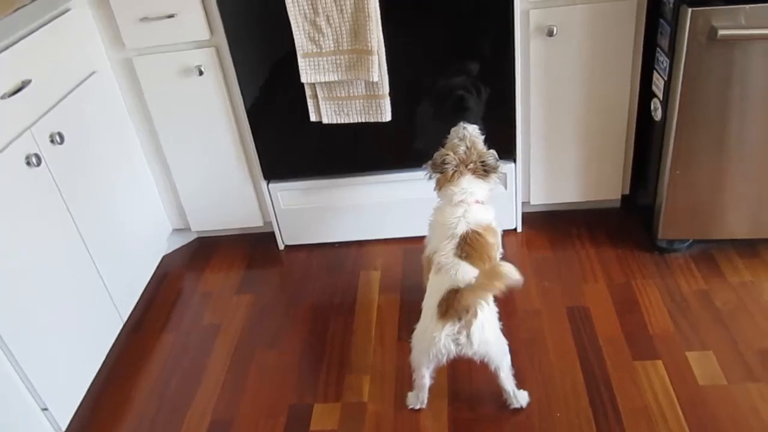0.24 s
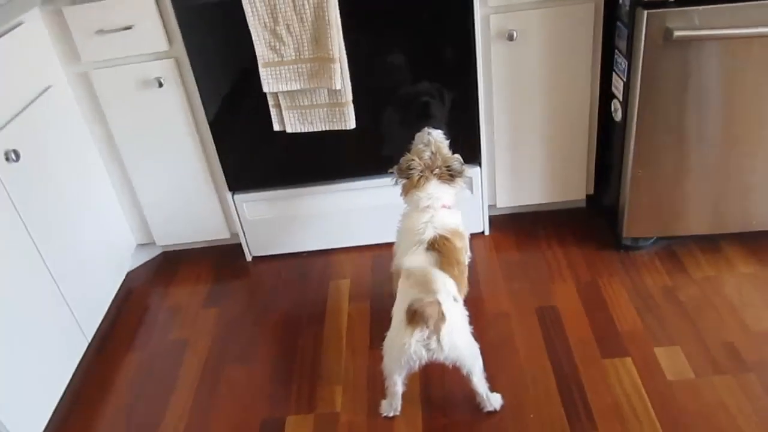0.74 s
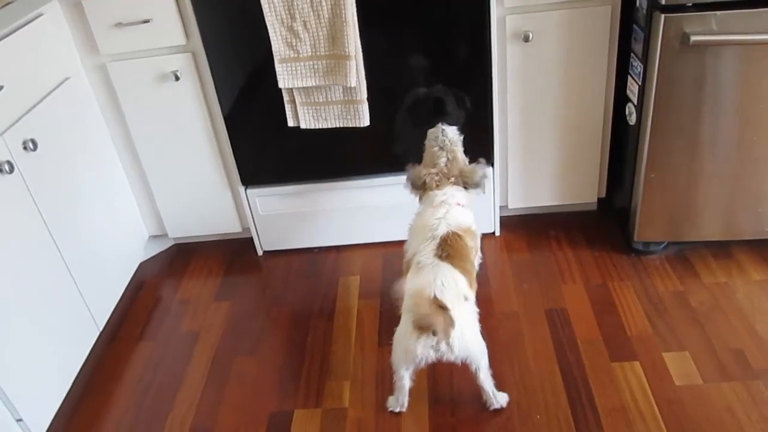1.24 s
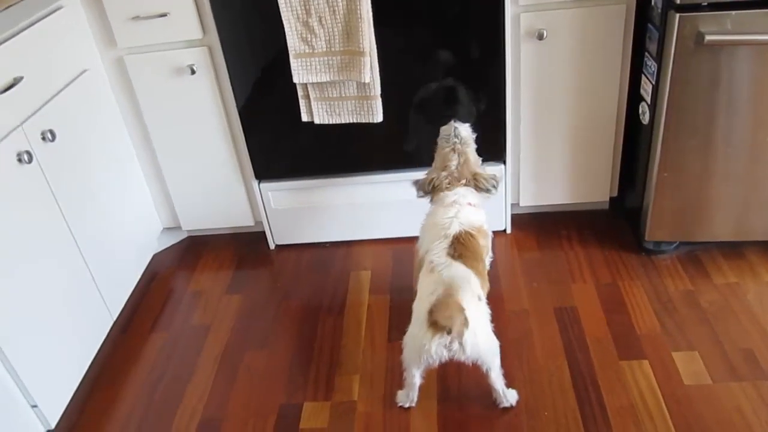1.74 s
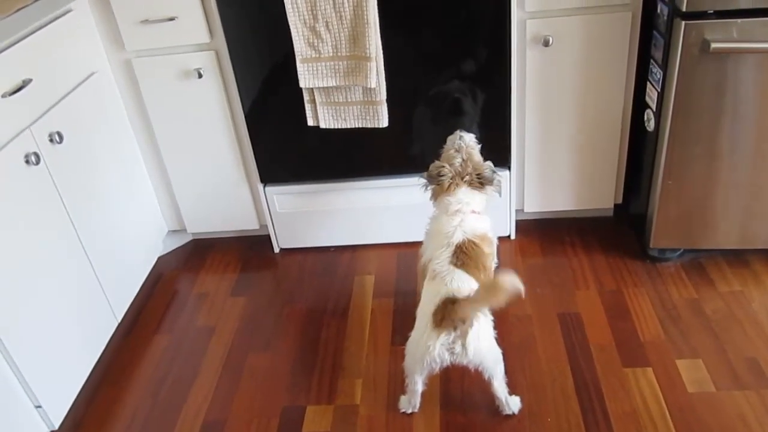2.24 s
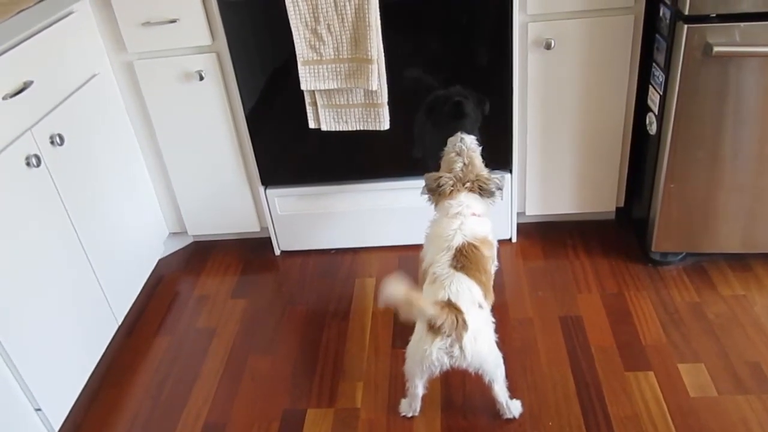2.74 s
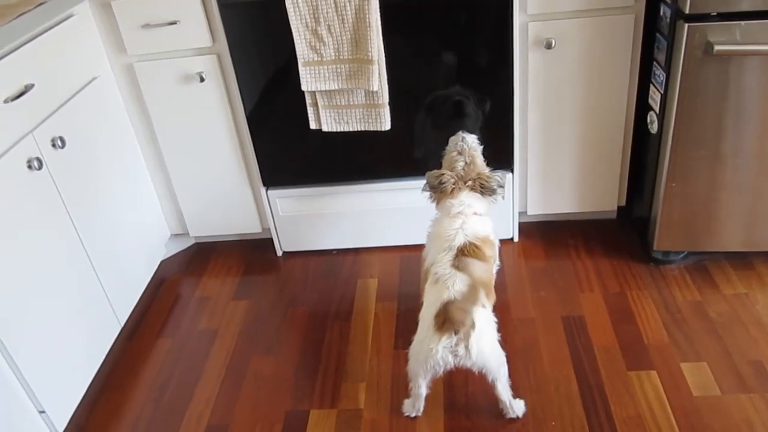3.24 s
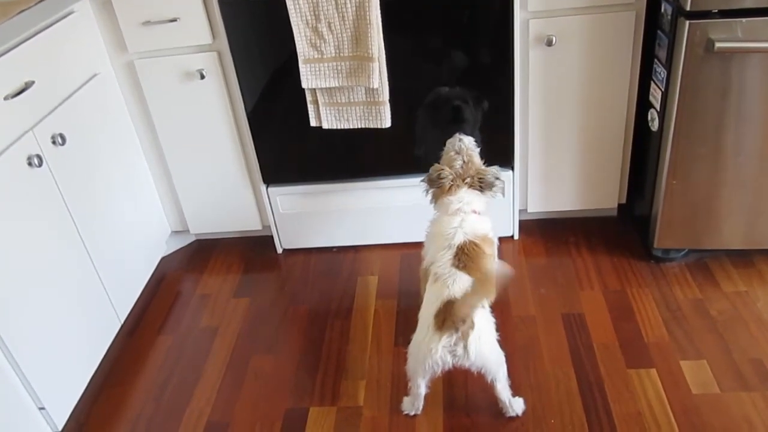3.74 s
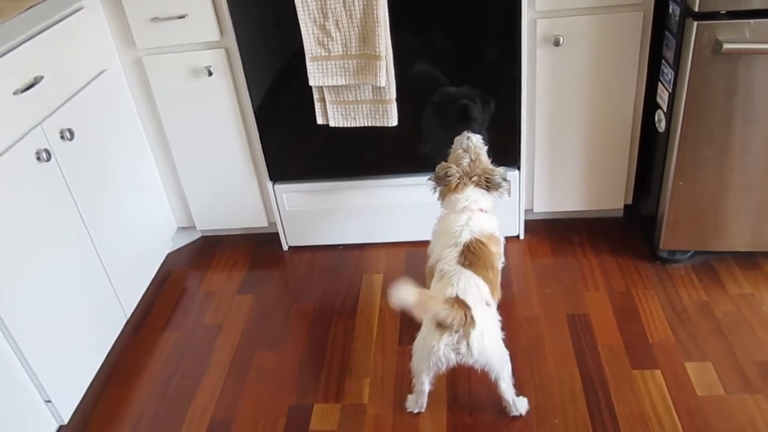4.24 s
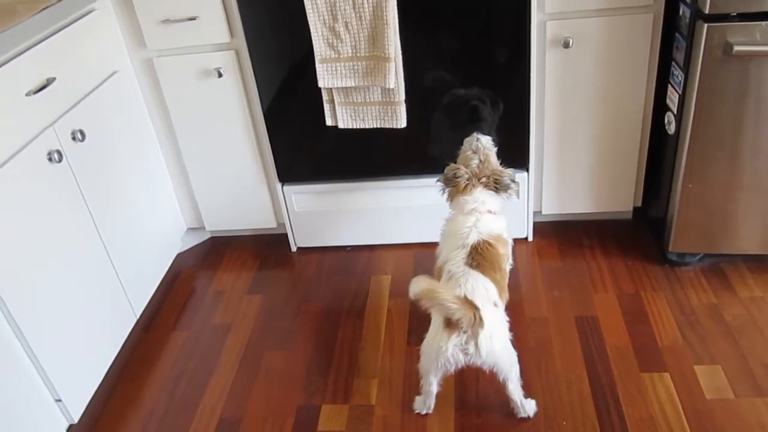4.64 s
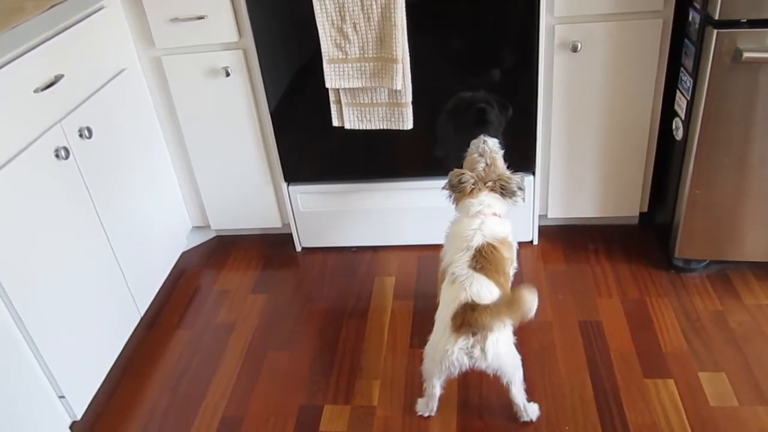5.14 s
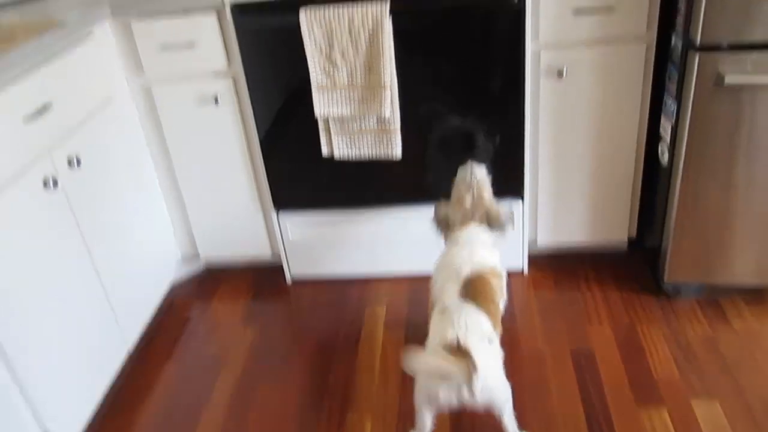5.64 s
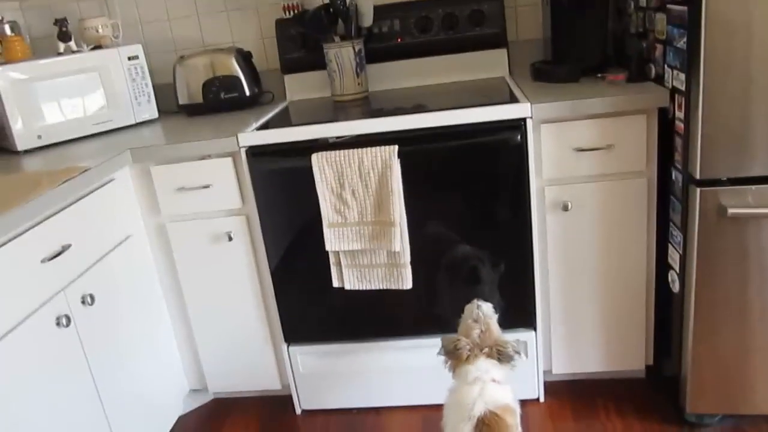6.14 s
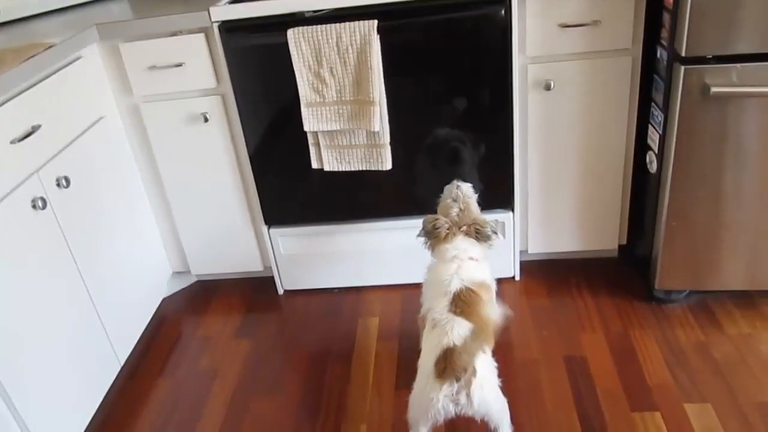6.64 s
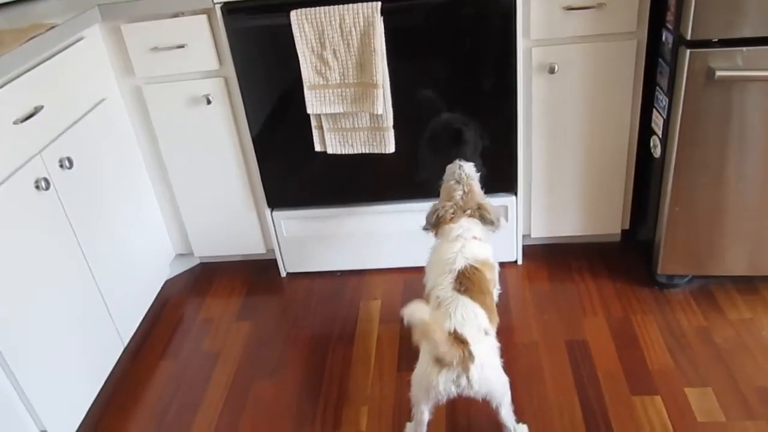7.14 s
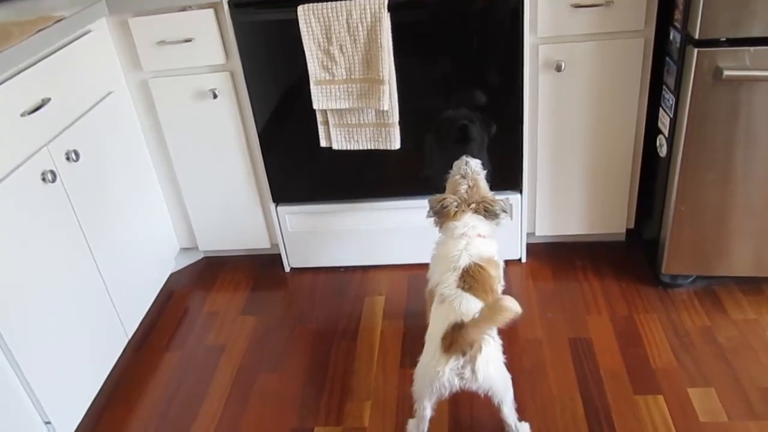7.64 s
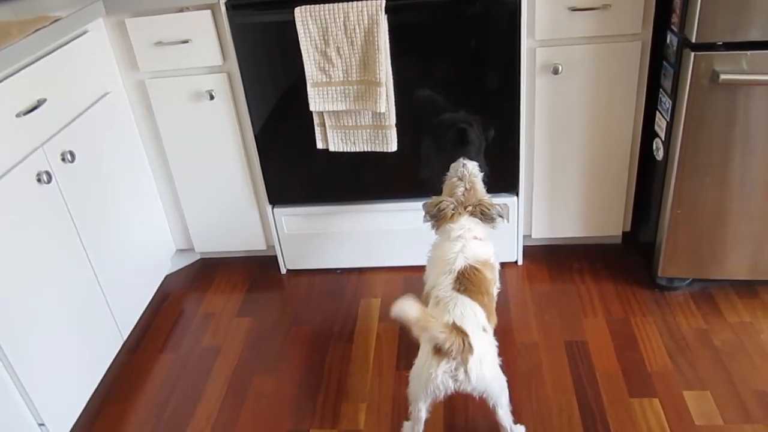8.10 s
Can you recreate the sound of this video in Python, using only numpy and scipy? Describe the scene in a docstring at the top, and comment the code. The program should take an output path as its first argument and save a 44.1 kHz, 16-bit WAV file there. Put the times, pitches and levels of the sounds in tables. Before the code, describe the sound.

A small dog growls and barks in a hard-walled kitchen. Faint hand bumps and throaty grunts come first, then a rising rattly growl breaks into two sharp barks and a quick sniff. Three longer growls follow, each ending in one yelping bark, and a final growl stops unbarked. Echoes ring after every bark over soft rumble and hiss. Close hand-held camera, nearly mono, ducking on loud sounds.

```python
"""A small dog growls at its reflection in an oven door, in a hard-walled kitchen over a steady hush of rumble and hiss.
Faint grunts and dull bumps of the hand on the camera are heard before and during the first growl and barks. Five growls
are noisy vocal-fold slaps through moving mouth resonances, with single hard flaps standing out. The first breaks into
two barks, the next three into one each, with yelps and squeaks; a sniff follows two barks, a low hum swells near 4 s,
and the last growl ends unbarked. Echoes ring on; a hand-held camera hears it almost in mono and turns down when loud."""
import sys
import numpy as np
from scipy import signal
from scipy.fft import rfft, irfft
from scipy.io import wavfile
from scipy.ndimage import uniform_filter1d, minimum_filter1d, map_coordinates

SR = 44100
rng = np.random.default_rng(int(sys.argv[2]) if len(sys.argv) > 2 else 0)


def wav_record(signal):
    """Record a signal, one row per channel, as 16-bit PCM in the file named by sys.argv[1]."""
    frames = np.transpose(np.atleast_2d(signal))
    bounded = np.clip(frames, -1, 1)
    # unit amplitude maps onto the largest positive 16-bit level
    quanta = np.round(bounded * 32767).astype(np.int16)
    wavfile.write(sys.argv[1], SR, quanta)


N = 369116
TIME = np.arange(N) / SR  # seconds


def amp(db):
    """Turn decibels into a gain."""
    return 10 ** (np.asarray(db) / 20)


def unit(x):
    """Scale x to an average (rms) strength of 1."""
    return x / np.sqrt(np.mean(x ** 2) + 1e-20)


def along(points, hz):
    """Read (Hz, value) points at any frequency, on a log axis."""
    f, v = np.transpose(points)
    return np.interp(np.log(hz + 1), np.log(f), v)


def curves(rows, t):
    """Read each column after the first at the times t."""
    s, *cols = np.transpose(rows)
    return [np.interp(t, s, c) for c in cols]


def bell(t, centre, width):
    """A smooth swell: 1 at its centre, down to 37 % one width away."""
    return np.exp(-((t - centre) / width) ** 2)


def wobble(t, rate):
    """A smooth random curve with `rate` random points a second."""
    knots = (t - t[0]) * rate
    return map_coordinates(rng.standard_normal(int(knots[-1]) + 4), [knots])


def ring(x, response):
    """Let x set off an impulse response of energy 1."""
    return signal.fftconvolve(x, response / np.linalg.norm(response))[:len(x)]


def colour(x, points, size=8192):
    """Shape x by a (Hz, dB) spectrum without any sound ahead of its cause."""
    log_gain = np.log(amp(along(points, np.fft.rfftfreq(size, 1 / SR))))
    # folding the cepstrum onto positive times gives the minimum-phase filter
    cepstrum = irfft(log_gain)
    cepstrum[1:size // 2] *= 2
    cepstrum[size // 2 + 1:] = 0
    return ring(x, irfft(np.exp(rfft(cepstrum))))


def resonate(x, modes, size=2048):
    """Fixed (Hz, width in Hz, dB) resonances, each of second order for dark valleys."""
    t = np.arange(size) / SR
    response = np.zeros(size)
    for hz, width_hz, db in modes:
        swell_and_fade = t * np.exp(-np.pi * width_hz * t * 1.5)
        response += amp(db) * width_hz ** 2 * swell_and_fade * np.sin(2 * np.pi * hz * t)
    return ring(x, response)


def glide(x, centre_hz, width_hz, size=2048):
    """One steep resonance with a moving centre; width_hz sets how fast its ringing fades."""
    t = np.arange(size) / SR
    # shift the moving centre down to 0 Hz, filter there, shift back
    turn = np.exp(2j * np.pi * np.cumsum(centre_hz) / SR)
    return np.sqrt(2) * np.real(turn * ring(x / turn, t * np.exp(-np.pi * width_hz * t)))


def span(start, length, attack, release):
    """Sample numbers of one call, its age in seconds, and a gate that opens at its start and closes after its end."""
    first = max(round(start * SR), 0)
    last = min(round((start + length + .12) * SR), N)
    at = np.arange(first, last)
    age = (at - at[0] + 1) / SR
    opening = 1 - np.exp(-age / attack)
    closing = np.exp(-np.maximum(age - length, 0) / release)
    return at, age, opening * closing


def puffs(rows, spectrum, attack):
    """Short bursts of coloured noise; each row: start in seconds, level in dB, seconds to fall by 60 dB."""
    shape = np.zeros(N)
    for s, db, t60 in rows:
        age = np.maximum(TIME - s, 0)
        shape += amp(db - 60 * age / t60) * (1 - np.exp(-age / attack))
    return shape * colour(rng.standard_normal(N), spectrum)


def notes(rows, sag_hz_per_s, waver, waver_rate):
    """Brief, nearly pure notes that swell, sag in pitch and die."""
    out = np.zeros(N)
    for s, width, hz, db in rows:
        at = np.flatnonzero(np.abs(TIME - s) < 3 * width)
        t = TIME[at]
        pitch = (hz - sag_hz_per_s * (t - s)) * (1 + waver * wobble(t, waver_rate))
        turns = np.cumsum(pitch) / SR + rng.random()
        out[at] += amp(db) * bell(t, s, width) * np.sin(2 * np.pi * turns)
    return out


def background():
    """Steady noise for the rumble and hiss of the home, with a low sine hum that swells and fades once."""
    # Each row: frequency in Hz, relative level in dB per Hz.
    home = [(12, -36.5), (20, -20.5), (55, 3), (211, -3.5), (270, -0.5), (363, -6), (464, -5), (964, -16.5),
            (1660, -18.5), (3540, -25.5), (6090, -30), (9910, -35), (13000, -53.5)]
    hush = amp(-50.5) * unit(colour(rng.standard_normal(N), home))
    hum = np.sqrt(2) * np.sin(2 * np.pi * 74.4 * TIME)
    return hush + amp(-50) * bell(TIME, centre=3.95, width=0.61) * hum


def bumps():
    """Dull thumps of the hand on the camera, from low noise."""
    # Each row: start in seconds, level in dB, seconds to fall by 60 dB.
    bump_times = [(0.33, -45, 0.67), (0.76, -40, 1), (1.2, -37, 0.18)]
    # Colour of a bump. Each row: frequency in Hz, level in dB.
    bump_colour = [(25, -33.5), (70, -5), (130, -11.5), (300, -12), (900, -85)]
    return puffs(bump_times, bump_colour, attack=0.0039)


def kitchen(x, first_wall=0.0036, early_db=4, early_time=0.11, count=14):
    """Dense fading echoes, strongest from the near cabinets; their fine pattern drifts slowly."""
    # How long the echoes last. Each row: frequency in Hz, seconds to fall by 60 dB.
    echo_times = [(200, 0.63), (530, 0.57), (1400, 0.64), (3700, 0.64), (9700, 0.56)]
    out = np.zeros(N)
    for k in range(count):
        # noise in which each frequency fades at its own speed
        hz, t, z = signal.stft(rng.standard_normal(SR * 3 // 4), SR, nperseg=256)
        fade = amp(-60 * t / along(echo_times, hz)[:, None])
        tail = signal.istft(z * fade, SR, nperseg=256)[1]
        age = np.arange(len(tail)) / SR
        tail *= (age > first_wall) * amp(early_db * np.exp(-age / early_time))
        # each random echo pattern fades into the next
        share = np.maximum(1 - np.abs(np.linspace(0, count - 1, N) - k), 0)
        at = np.flatnonzero(share)
        wet = signal.fftconvolve(x[at] * np.sqrt(share[at]), tail / np.linalg.norm(tail))[:N - at[0]]
        out[at[0]:at[0] + len(wet)] += wet
    return out


def standing_waves(x):
    """Parallel cabinet fronts strengthen a few tones and let them ring on."""
    # Each row: frequency in Hz, width in Hz, lift in dB.
    held_tones = [(410.4, 19, 4.5), (482, 18, 4), (579, 16, 4), (653, 22, 4), (792, 16, 4.5), (925, 24, 6),
                  (1050, 26, 4)]
    out = x.copy()
    for hz, width_hz, lift_db in held_tones:
        out += (amp(lift_db) - 1) * signal.lfilter(*signal.iirpeak(hz, hz / width_hz, SR), x)
    return out


def grunts():
    """Faint bursts of throaty noise before the first growl and the second bark."""
    # Each row: start in seconds, level in dB, seconds to fall by 60 dB.
    grunt_times = [(0.078, -39.5, 0.094), (0.368, -40, 0.28), (1.705, -44, 0.6)]
    # Colour of a grunt. Each row: frequency in Hz, level in dB.
    grunt_colour = [(150, 9), (450, 0.5), (650, 5.5), (900, 1), (1400, -16.5), (2150, -4), (2700, -22),
                    (3300, -8), (4500, -30), (9000, -17.5), (13000, -39)]
    return puffs(grunt_times, grunt_colour, attack=0.0051)


def sniffs():
    """The dog snatches air after a bark: a soft burst of hissing noise."""
    # Each row: start in seconds, level in dB, seconds to fall by 60 dB.
    sniff_times = [(2.0, -39.5, 0.32), (3.78, -40.5, 0.2)]
    # Colour of a sniff. Each row: frequency in Hz, level in dB.
    sniff_colour = [(500, -8), (1500, -10), (2000, 3), (2600, -9.5), (3200, -2), (4000, -23), (4700, -6),
                    (5600, -18.5), (8000, -13.5), (12000, -30)]
    return puffs(sniff_times, sniff_colour, attack=0.029)


def yelps():
    """Surges in which a bark breaks into a clear, sagging tone."""
    # Each row: centre in seconds, half-length in seconds, pitch at the centre in Hz before waver, level in dB.
    yelp_notes = [ (1.309, .014, 603.6, 0), (1.343, .009, 624.4, 4.5), (1.373, .009, 573.7, 2),
                  (1.828, .016, 641, -3.5), (1.893, .016, 784, -5.5), (3.469, .011, 608, -1.5),
                  (3.525, .014, 594, -5), (3.565, .009, 571, -7.5), (5.706, .014, 793.7, -3.5),
                  (5.757, .016, 578.8, -0.5), (5.82, .014, 648, -1.5), (7.071, .013, 650.5, -8.5),
                  (7.097, .009, 603.5, 0.5), (7.168, .018, 580, -2), ]
    return notes(yelp_notes, sag_hz_per_s=750, waver=0.02, waver_rate=224.6)


def squeaks():
    """Thin whistling tones at the height of a bark."""
    # Each row: centre in seconds, half-length in seconds, pitch at the centre in Hz before waver, level in dB.
    squeak_notes = [ (1.307, .008, 4620, -25), (1.36, .008, 4650, -15), (1.79, 0.013, 4800, -44),
                    (3.5, .008, 4550, -26), (3.53, 0.012, 4660, -20), (5.745, 0.012, 4660, -25),
                    (5.787, 0.0082, 4667, -23), ]
    return notes(squeak_notes, sag_hz_per_s=1660, waver=0.014, waver_rate=990)


def folds(rate, jitter, scatter_db, limp_db, puff):
    """Uneven vocal-fold slaps, alternating strong and weak by limp_db, and the puff of air after each; both rms 1."""
    cycles = np.cumsum(rate) / SR
    chance = rng.standard_normal((int(cycles[-1] * 2) + 2, 2))
    gaps = np.exp(jitter * chance[:, 0] - jitter ** 2 / 2)
    at = np.searchsorted(cycles, np.cumsum(gaps) - gaps[0]) + SR // 1000
    sizes = amp(scatter_db * chance[:, 1] + limp_db * (-1) ** np.arange(len(at)))
    keep = at < len(rate)
    slaps = np.bincount(at[keep], sizes[keep], len(rate)) / np.sqrt(rate)
    # each slap lets out air that dies away over `puff` seconds
    flow = np.sqrt(signal.lfilter([1], [1, -np.exp(-1 / (puff * SR))], slaps ** 2))
    return unit(slaps), unit(flow * rng.standard_normal(len(rate)))


def hoarse(slaps, puffs_of_air, air, window):
    """Slaps mixed with a share of air; held lung pressure evens out the slow swells."""
    x = np.sqrt(1 - air) * slaps + np.sqrt(air) * puffs_of_air
    power = np.abs(uniform_filter1d(x ** 2, int(window * SR)))
    return x / np.sqrt(power + 0.098)


def hard_flaps(t, puff_db=-16, puff_s=0.0059, pause_s=0.0094):
    """The folds stick for a moment, then burst open: how freely they rattle, and the bursts."""
    # Single flaps that stand out of a growl. Each row: time in seconds, level in dB.
    flap_times = [ (0.757, -14), (0.799, -16.5), (0.836, -14.5), (0.874, -9), (0.913, -6), (0.95, -6),
                  (0.995, -7), (1.052, 0.5), (1.233, -5), (2.348, -9), (2.378, -8.5), (2.702, -10.5),
                  (2.806, 0.5), (3.202, 0.5), (3.267, -1), (4.094, -9), (4.171, -3), (4.305, 1), (4.393, 2),
                  (4.58, 3), (4.657, 1.5), (4.702, 2), (5.127, 4.5), (6.285, -15), (6.305, -12),
                  (6.708, -1.5), (7.671, -12.5), (7.752, 0), (7.828, -4), (7.855, 0), (7.953, -1),
                  (8.039, -2), (8.074, 0), (8.13, -2), ]
    free, bursts = np.ones(len(t)), np.zeros(len(t))
    for s, db in flap_times:
        if t[0] <= s < t[-1]:
            first = np.searchsorted(t, s)
            fade = np.exp(-(t[first:] - s) / puff_s)
            burst = amp(puff_db) * fade * rng.standard_normal(len(t) - first)
            burst[0] = 1  # the click of the flap itself
            bursts[first:] += amp(db) * burst
            free *= 1 - .8 * bell(t, s - pause_s, pause_s)
    return free, bursts


def growls():
    """A dense, uneven rattle broken by single hard flaps, through chest, throat, mouth and lips."""
    # Each row: start in seconds, length in seconds, level at the start in dB, level at the end in dB, softness of the
    # onset in dB, chest tone in dB, muzzle overtones in dB (both against the level), mean rattle rate in Hz.
    growl_rows = [ (0.679, 0.67, -46.5, -24, -1.5, 0, -24, 90),
                  (2.348, 1.05, -30.5, -23, 10.5, -3.5, -35.5, 74.97),
                  (4.092, 1.684, -26.5, -18, 4, -6, -29, 72.06),
                  (6.285, 0.87, -22.5, -22, 6, -9, -30, 84.95),
                  (7.666, 0.83, -29, -20.5, 2, -8.5, -37.5, 71.69), ]
    # The lips curl once in each growl. Each row: seconds after its start, half-length in seconds, snarl in dB against
    # the level, lip resonance in Hz, its glide in Hz per second, bared-teeth overtones in dB against the snarl.
    lip_curls = [ (0.11, 0.26, -18, 2330, -450, -4.5), (0.077, 0.15, -25, 1930, 898, -6),
                 (0.34, 0.37, -31.5, 2010, 297, -7), (0.33, 0.4, -23.5, 2139, -18, -7.5),
                 (0.085, 0.48, -17.5, 2172, -120, -8.5), ]
    # The tongue drops and frees the mouth. Each row: seconds after the start, time of the drop in seconds, mouth
    # resonance it sinks to in Hz, mouth in dB against the level before, and after.
    tongue_drops = [(0.52, .055, 1600, -51, -19), (0.36, 0.05, 1406, -29.5, -26),
                    (0.7, 0.037, 1595, -45.5, -23.5), (0.74, .055, 1500, -42, -21),
                    (.72, .055, 1600, -45, -24)]
    # Brief surges and slackenings of the throat. Each row: centre in seconds, half-length in seconds, change in dB.
    throat_surges = [ (0.94, 0.11, 7), (1.09, 0.035, 8), (2.83, 0.042, 8), (2.91, 0.19, 6),
                     (3.381, 0.08, -2), (4.42, 0.04, 3), (4.735, 0.027, 3.5), (4.849, 0.057, -2.5),
                     (6.741, 0.137, -1.5), (6.987, 0.032, -10.5), (8.03, 0.044, -5), (8.3, 0.1, 1), ]
    # Throat with the mouth nearly shut. Each row: frequency in Hz, level in dB.
    throat = [(250, -28.5), (380, -16), (470, -6), (530, -3.5), (580, 1), (650, 1.5), (715, -3), (795, -1),
              (880, -16), (1200, -29), (2600, -65), (6000, -65), (12000, -86)]
    # The deep part of the growl. Each row: frequency in Hz, level in dB.
    deep = [(60, -24.5), (150, -24.5), (190, -10.5), (225, 0), (300, -11), (345, -8), (405, -2), (480, 8),
            (560, -5.5), (800, -28), (2000, -77)]
    # Thin overtones of every growl. Each row: frequency in Hz, width in Hz, level in dB.
    muzzle = [(2790, 840, -4.5), (7030, 200, -2)]
    # Overtones that bared teeth add. Each row: frequency in Hz, width in Hz, level in dB.
    teeth = [(3197, 190, -1), (3800, 140, -1.1), (6760, 170, -1.3)]
    # Air between the lips. Each row: frequency with slack lips in Hz, width setting in Hz, dB against the muzzle.
    lip_air = [(7720, 260, -18.5), (9020, 310, -14.5)]
    relaxed_db, lips_top_hz = -41.5, 2470  # snarl with slack lips; cap on the lip resonance before its tremble
    lift_per_db = 0.0034  # share by which the lip air rises per dB of snarl
    shut_hz, sink_hz_per_s = 1710, 120  # mouth resonance before the tongue drops; its slow fall afterwards
    out = np.zeros(N)
    for growl, curl, tongue in zip(growl_rows, lip_curls, tongue_drops):
        start, length, first_db, last_db, onset_db, chest_db, muzzle_db, rattle_hz = growl
        drop_s, drop_time, open_hz, shut_db, open_db = tongue
        curl_s, curl_width, curl_db, lips_hz, lips_glide, teeth_db = curl
        at, age, gate = span(start, length, attack=0.00096, release=0.011)
        t = TIME[at]
        db = np.interp(age, [0, length], [first_db, last_db]) - onset_db * np.exp(-age / 0.099)
        surge_db = sum(lift_db * bell(t, s, width) for s, width, lift_db in throat_surges)
        snarl_db = relaxed_db + (curl_db - relaxed_db) * bell(age, curl_s, curl_width)
        dropped = .5 + .5 * np.tanh((age - drop_s) / (2 * drop_time))

        rate = rattle_hz * np.exp(.2 * wobble(t, rate=14))
        source = folds(rate, jitter=.4, scatter_db=3, limp_db=0, puff=.005)
        free, bursts = hard_flaps(t)
        pressure = amp(db) * gate * free
        rattle = hoarse(*source, air=.3, window=.06) * pressure
        hiss = hoarse(*source, air=.65, window=.06) * pressure + amp(-2) * bursts
        push = rattle * amp(surge_db) + bursts
        snarl = hiss * amp(snarl_db)
        mouth = hiss * amp(surge_db + shut_db + (open_db - shut_db) * dropped)
        overtones = hiss * amp(muzzle_db)

        tremble = 1 + 0.006 * wobble(t, rate=12)
        sink_hz = sink_hz_per_s * np.maximum(age - drop_s, 0)
        mouth_hz = shut_hz + (open_hz - shut_hz) * dropped - sink_hz
        curled_hz = np.minimum(lips_hz + lips_glide * age, lips_top_hz)
        lowest_hz = np.interp(snarl_db, [-42, -23], [780, 1010])  # baring the teeth lifts the lowest resonance

        out[at] += amp(-1.5) * colour(push, throat)
        out[at] += amp(1.0) * colour((rattle + bursts / 2) * amp(chest_db), deep)
        out[at] += amp(-17.5) * glide(push, lowest_hz * tremble, width_hz=142)
        out[at] += amp(-16) * resonate(overtones, muzzle)
        out[at] += amp(teeth_db) * resonate(snarl, teeth)
        out[at] += amp(-0.5) * glide(snarl, curled_hz * tremble, width_hz=135)
        out[at] += glide(mouth, mouth_hz * tremble, width_hz=95)
        out[at] += amp(-7) * glide(mouth, .88 * mouth_hz, width_hz=380)
        for hz, width_hz, air_db in lip_air:
            lifted_hz = hz * (1 + lift_per_db * (snarl_db - relaxed_db)) * tremble
            out[at] += glide(overtones * amp(air_db), lifted_hz, width_hz)
    return out


def barks():
    """Hard-driven folds that double their period; the jaw opens a moment after the voice starts, then shuts."""
    # Each row: start in seconds, length in seconds, level in dB, open jaw in dB, rasp in dB (both against the level),
    # lag of the jaw in seconds, factor on the mouth resonances.
    bark_rows = [ (1.267, 0.168, 1, -8, -30.5, 0.015, 0.949),
                 (1.741, 0.17, -6.5, -8.5, -32.5, 0.0054, 0.97), (3.44, 0.15, -0.5, -6, -29, 0.019, 1.03),
                 (5.682, .19, -3.5, -6, -28, 0.03, 0.976), (7.051, 0.17, -4.5, -4.5, -26, 0.027, 1.09), ]
    # Pitch through a bark. Each row: share of its length, slap rate in Hz before its random waver.
    bark_pitch = [(0, 261.2), (.2, 405.7), (.55, 400), (.85, 348), (1.1, 266), (1.4, 187)]
    # Two sinking mouth resonances. Each row: share of the length, vowel in Hz, upper in Hz, before the bark's factor.
    bark_vowel = [(0, 1436, 3240), (.25, 1315, 3190), (.5, 1286, 2940), (.8, 1161, 2830), (1, 960, 2810)]
    # Chest tone. Each row: frequency in Hz, level in dB.
    chest = [(100, -35), (220, -23.5), (320, -12), (400, -13), (480, 5), (580, 5.5), (650, 1), (720, -1.5),
             (800, -5.5), (900, -12), (1300, -20), (3000, -66.5)]
    # Open jaw. Each row: frequency in Hz, level in dB.
    jaw_colour = [(600, -32.5), (900, 6), (1050, 14), (1300, 1), (1550, -8.5), (1800, -14.5), (2300, -18.5),
                  (3300, -28.5), (4200, -26.5), (7000, -60.5)]
    # Rasp. Each row: frequency in Hz, level in dB.
    rasp_colour = [(1500, -47), (2400, -4), (3600, -20), (4200, -18.5), (4540, 14), (4800, 14),
                   (5300, -4.5), (6300, 3), (6800, 1), (7700, 9.5), (9000, 5.5), (10000, -17), (11200, -3),
                   (13000, -39)]
    # Narrow tones that sing out about two thirds through. Each row: frequency in Hz, width in Hz, level in dB.
    closing_ring = [(2810, 90, 6), (6295, 250, -5)]
    sag_db, grain_db = 13.5, 8  # pressure lost over a bark; fall within each shake of the rattle
    jaw_widest, jaw_closing_db, rasp_closing_db = 0.11, 1, 14.5  # share of the length; loss of each by its end
    out = np.zeros(N)
    for start, length, level_db, jaw_db, rasp_db, jaw_lag, mouth_scale in bark_rows:
        at, age, gate = span(start, length, attack=0.018, release=0.02)
        gate = gate * (1 - np.exp(-age / 0.014))  # soft first moment
        progress = age / length
        db = level_db - sag_db * np.minimum(progress, 1)
        closed = ((progress - jaw_widest) / (1 - jaw_widest)) ** 2
        opening = .5 + .5 * np.tanh((age - jaw_lag) / 0.029)
        rate, = curves(bark_pitch, progress)
        vowel_hz, upper_hz = mouth_scale * np.array(curves(bark_vowel, progress))

        wavering_rate = rate * np.exp(.05 * wobble(age, rate=45))
        source = folds(wavering_rate, jitter=.035, scatter_db=2.5, limp_db=3, puff=.001)
        # a growl-like rattle, near 95 Hz, goes on shaking the bark
        shakes = np.cumsum(94.8 * np.exp(.3 * wobble(age, rate=60))) / SR
        grain = unit(amp(-grain_db * (shakes % 1)))
        pressure = amp(db) * gate
        voice = hoarse(*source, air=.07, window=.04) * pressure
        air = hoarse(*source, air=.7, window=.04) * pressure * grain
        jaw = voice * opening * amp(jaw_db - jaw_closing_db * closed) * grain
        rasp = air * opening ** 2 * amp(rasp_db - rasp_closing_db * closed)

        out[at] += amp(3.5) * colour(voice, chest)
        out[at] += amp(1.5) * colour(jaw, jaw_colour)
        out[at] += amp(-4.5) * glide(jaw, vowel_hz, width_hz=165)
        out[at] += amp(7.5) * colour(rasp, rasp_colour)
        out[at] += amp(-1.0) * glide(rasp, upper_hz, width_hz=160)
        out[at] += amp(5) * resonate(rasp * bell(progress, centre=.66, width=.25), closing_ring)
        # the folds slacken after the jaw shuts: a soft falling note
        trail = bell(progress, centre=1.2, width=0.23)
        out[at] += amp(-17.5 + db) * trail * np.sin(2 * np.pi * np.cumsum(rate) / SR)
    return out


def gain_control(x):
    """Loud sound turns the gain down; it stays down for a moment, then creeps back up."""
    loudest_db, hold_s, recovery_db_per_s = -11, 0.2, 12
    power = np.abs(uniform_filter1d(np.mean(x ** 2, axis=0), SR // 33))
    needed_db = np.minimum(loudest_db - 10 * np.log10(power + 1e-12), 0)
    half = int(hold_s * SR / 2)
    # the shifted window looks back over the hold time
    held_db = minimum_filter1d(needed_db, 2 * half + 1, origin=half, mode="nearest")
    climb_db = recovery_db_per_s * TIME
    return x * amp(np.minimum.accumulate(held_db - climb_db) + climb_db)


def scene():
    """Dog and echoes are mostly in the middle; the two microphone ports differ mainly above 950 Hz."""
    near = growls() + barks() + grunts() + sniffs()
    tones = yelps() + squeaks()
    wet = kitchen(near + amp(-7.0) * tones)
    dog = standing_waves(amp(-3.0) * (near + tones) + amp(-0.5) * wet)
    mid = dog + background() + bumps()
    spread = amp(-23) * kitchen(near, count=6) - amp(-25) * dog
    side = signal.sosfiltfilt(signal.butter(2, 950, "high", fs=SR, output="sos"), spread)
    return np.array([mid + side, mid - side])


def record(dry):
    """The camera rides its gain, limits the highest peaks and keeps next to nothing above its band limit."""
    ridden = gain_control(dry)
    needed = np.minimum(1, .92 / (np.abs(ridden).max(axis=0) + 1e-9))
    hold = SR // 60  # samples
    gain = uniform_filter1d(minimum_filter1d(needed, hold), hold)
    band_limit = signal.ellip(10, .1, 90, 13280, fs=SR, output="sos")  # low-pass at 13280 Hz
    return signal.sosfilt(band_limit, ridden * gain)


dry = scene()
out = record(dry)
wav_record(out)
```